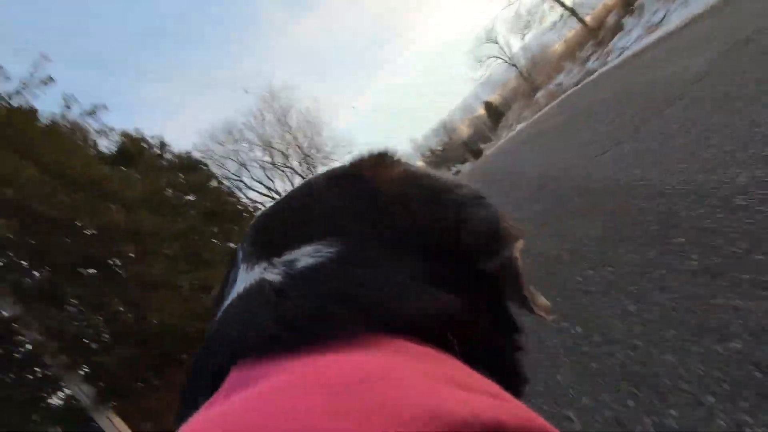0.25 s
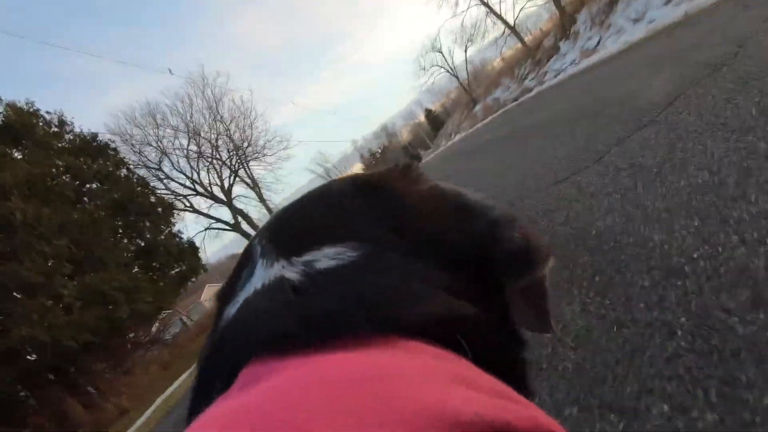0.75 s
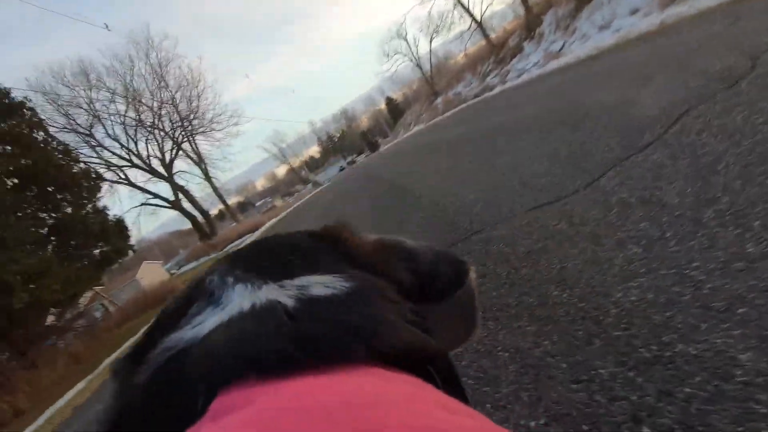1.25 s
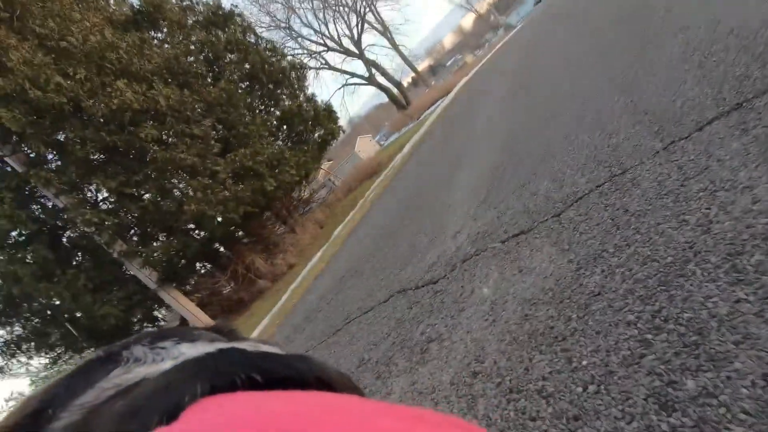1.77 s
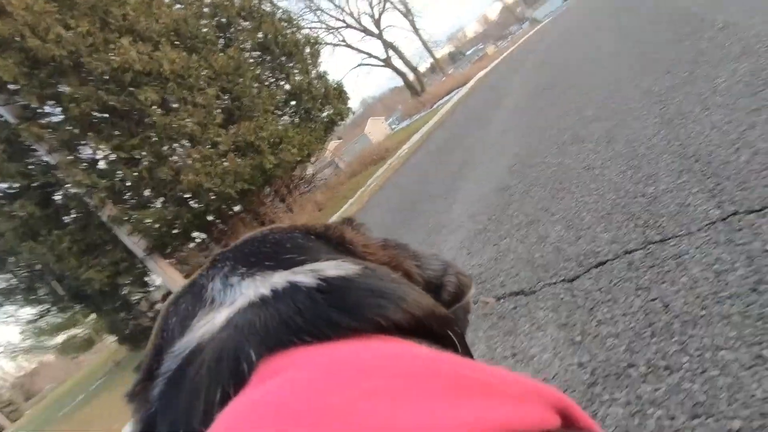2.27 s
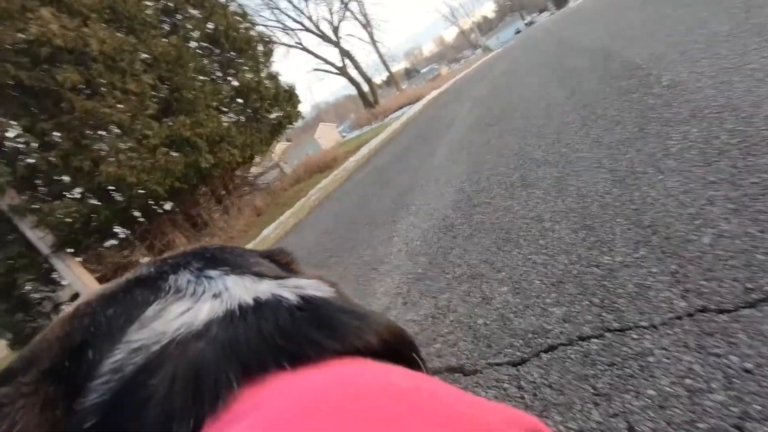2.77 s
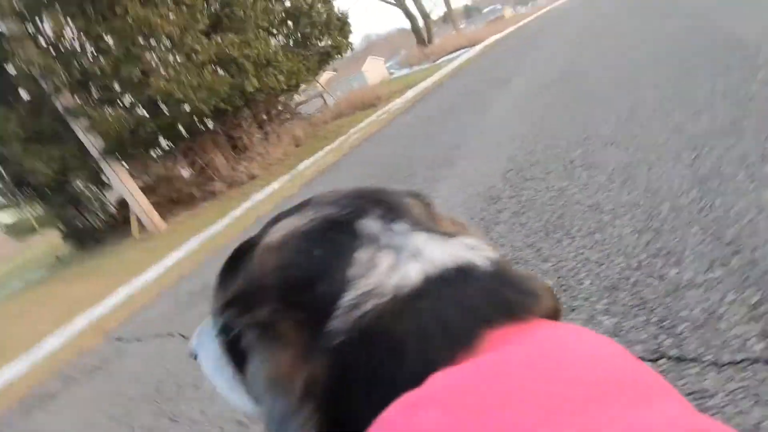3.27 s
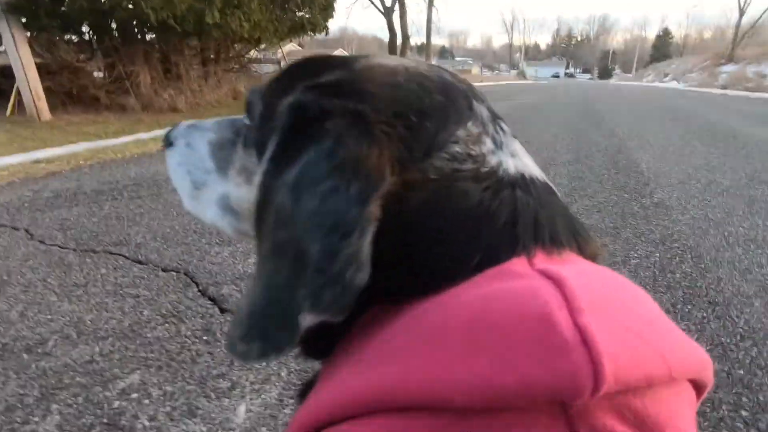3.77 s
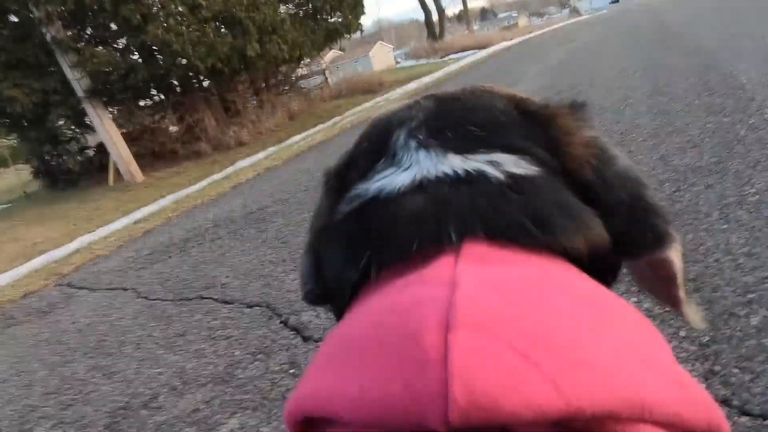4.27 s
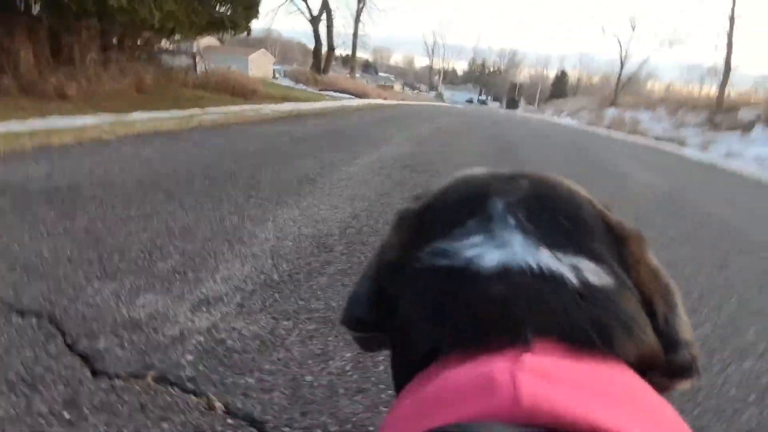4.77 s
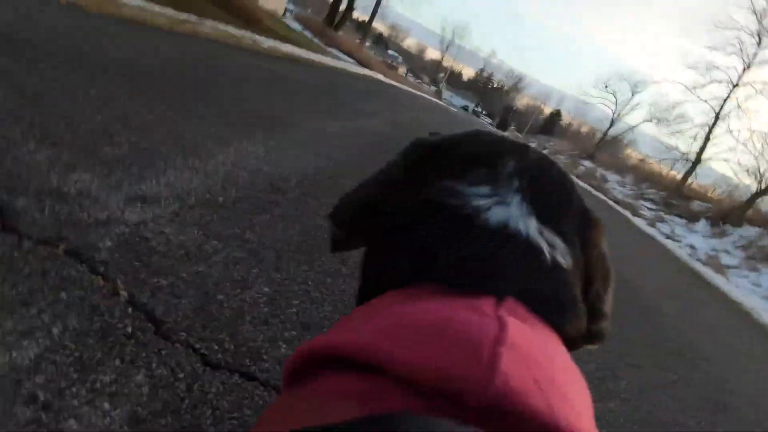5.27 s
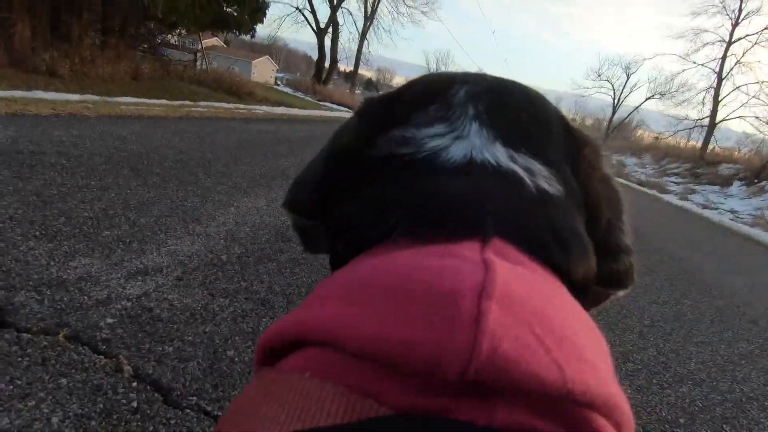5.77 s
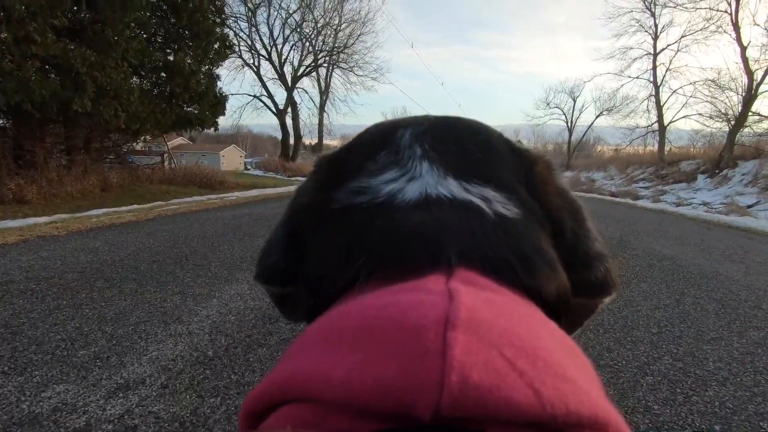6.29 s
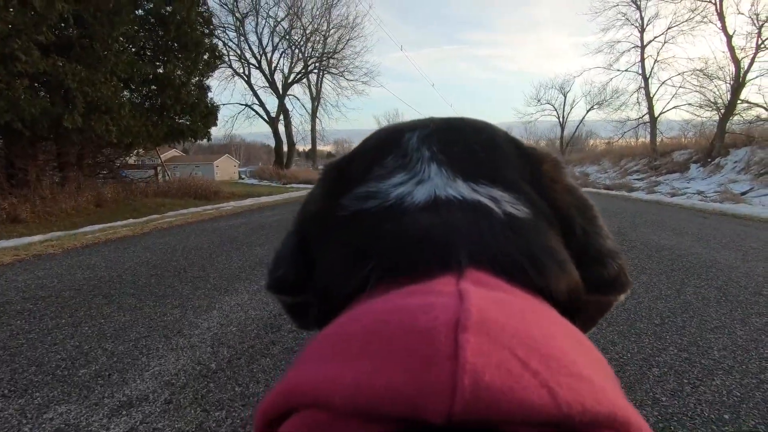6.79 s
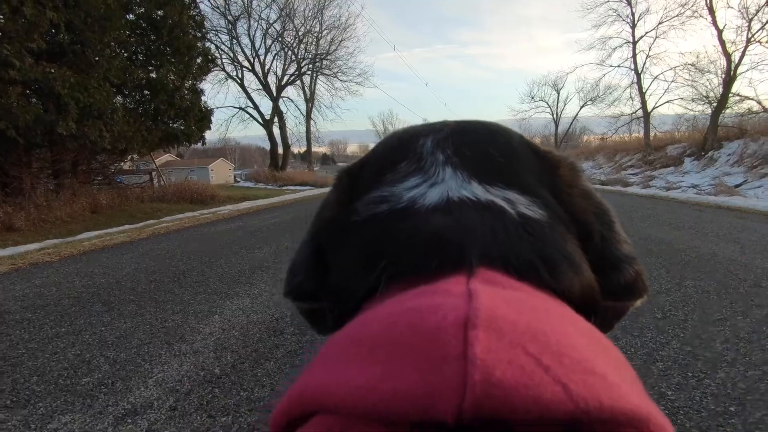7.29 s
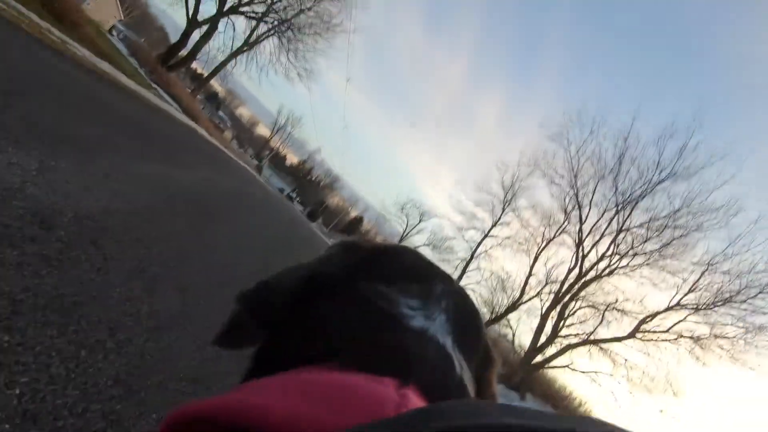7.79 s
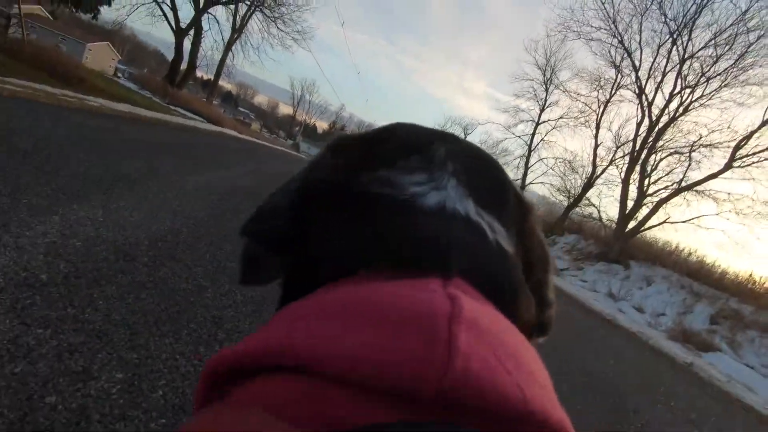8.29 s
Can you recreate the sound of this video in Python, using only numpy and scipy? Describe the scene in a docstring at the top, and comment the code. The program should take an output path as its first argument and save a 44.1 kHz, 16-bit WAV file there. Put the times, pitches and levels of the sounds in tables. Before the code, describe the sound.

Close, uneven strokes of fleece hiss and scrape over a camera strapped to a dog outdoors, with light claw ticks on asphalt, deep wind gusts and a faint traffic hum. Soon the mount starts jolting, adding low thumps and short knocks on the plastic case. These grow strongest past the middle, pause for a moment and come back briefly. Rubbing carries on to a soft final thump.

```python
"""A small camera rides on the fleece coat of a dog on a cold asphalt road.
From the start far traffic hums, wind buffets the microphone, claws tick and cloth rubs the case.
From about 2 s the dog's moves also jolt the strap mount (thumps) and knock the plastic case.
The shaking is strongest just after 5 s, eases briefly past 6 s and returns near 7 s.
Then mostly rubbing is left, with one last soft thump at the end."""
import sys
import numpy as np
from scipy import signal
from scipy.fft import rfft, irfft, next_fast_len
from scipy.io import wavfile
from scipy.ndimage import uniform_filter1d

SR = 44100
rng = np.random.default_rng(int(sys.argv[2]) if len(sys.argv) > 2 else 0)


def wrap_up_sound(samples):
    """Save the sound to the file named by the first command line argument, as 16-bit audio."""
    columns = np.atleast_2d(samples).T
    # keep every value between -1 and 1, then stretch to whole-number steps
    tamed = np.clip(columns, -1, 1)
    steps = np.round(tamed * 32767).astype(np.int16)
    wavfile.write(sys.argv[1], SR, steps)


N = 376613


def from_db(db):
    """Turn decibels (dB) into a number to multiply by."""
    return 10 ** (np.asarray(db) / 20)


def rms_one(x):
    """Scale a signal so that its average strength (rms) is 1."""
    return x / np.sqrt(np.mean(x ** 2) + 1e-20)


def in_time(rows):
    """Join rows of (seconds, values..) with straight lines: one curve for each value column."""
    s, *columns = np.transpose(rows)
    return [np.interp(np.arange(N) / SR, s, c) for c in columns]


def drift(per_s):
    """A wandering curve: per_s random points a second, joined by lines."""
    count = int(N / SR * per_s) + 2
    points = rng.standard_normal(3600)[:count]
    return np.interp(np.arange(N) / SR * per_s, np.arange(count), points)


def coloured(x, points):
    """Turn the lows and highs of x up or down along a curve of (Hz, dB) points."""
    size = next_fast_len(N)
    hz, db = np.transpose(points)
    bin_hz = np.arange(size // 2 + 1) * SR / size
    gain = from_db(np.interp(np.log(bin_hz + 1), np.log(hz), db))
    return irfft(rfft(x, size) * gain, size)[:N]


def resonate(x, modes):
    """Make x ring at each (Hz, width in Hz, dB); filtering twice deepens the gaps between rings."""
    out = 0
    for k, (hz, width_hz, level_db) in enumerate(modes):
        r = np.exp(-np.pi * width_hz * 1.5 / SR)
        band = [(1 - r * r) / 2, 0, (r * r - 1) / 2, 1, -2 * r * np.cos(2 * np.pi * hz / SR), r * r]
        out = out + (-1) ** k * from_db(level_db) * signal.sosfilt([band, band], x)
    return out


def grains(per_s, spread_db, smooth):
    """Tiny random slips of uneven size, mixed with some smooth noise."""
    sizes = from_db(spread_db * np.minimum(rng.exponential(1, N), 5)) * rng.choice([-1, 1], N)
    slipping = rng.random(N) < per_s / SR
    return rms_one(sizes * slipping) + smooth * rng.standard_normal(N)


def add(out, s, burst):
    """Mix a short sound into out, starting at s seconds."""
    i = max(round(s * SR), 0)
    out[i:i + len(burst)] += burst[:N - i]


def stroke_levels(swell_share=0.52, shape=1.48):
    """Hiss, drone and shake levels in dB: each stroke of cloth swells and dies over a light stirring."""
    # Each row: time in seconds, cloth hiss in dB, mount shake in dB.
    stirring = [(0, -71, -49), (1.05, -79, -54.5), (1.5, -78, -64), (1.75, -71, -53), (2.1, -77.5, -53.5),
                (3.0, -74.5, -50), (4.0, -81, -45.5), (5.0, -92, -48.5), (5.55, -83, -70),
                (6.2, -71, -48.5), (6.4, -82, -81), (6.85, -81, -59.5), (7.15, -76, -48.5), (7.6, -96, -65),
                (8.54, -92, -53)]
    # Each row: loudest moment in seconds, length in ms, then hiss, case drone and mount shake in dB.
    strokes = [(0.192, 23, -60.5, -73.5, -56), (0.831, 210, -71.5, -57, -49.5),
               (1.129, 76, -65, -58.5, -46.5), (1.22, 120, -65.5, -51, -46.5),
               (1.369, 128, -65.5, -51.5, -55.5), (1.673, 39, -80, -71, -35.5),
               (2.109, 85, -66.5, -50, -46), (2.219, 42, -60, -53, -60), (2.498, 176, -60, -47.5, -41),
               (2.62, 51, -65, -51.5, -50.5), (2.688, 62, -66, -56, -44), (2.873, 89, -63, -50, -47.5),
               (3.06, 64, -60.5, -47, -39.5), (3.279, 260, -60.5, -48.5, -47.5),
               (3.433, 270, -71.5, -53, -38), (3.776, 90, -62.5, -46, -44.5), (3.855, 116, -65.5, -51, -36),
               (4.062, 58, -64.5, -47.5, -42.5), (4.208, 118, -63.5, -49.5, -49),
               (4.331, 135, -67, -55.5, -38.5), (4.451, 137, -58, -48, -37), (4.673, 130, -67, -51, -41.5),
               (4.851, 320, -68.5, -62, -69), (5.081, 47, -61, -34.5, -26), (5.2, 164, -71.5, -58, -29.5),
               (5.456, 121, -63.5, -49, -30), (5.686, 97, -64, -50.5, -39.5),
               (5.839, 140, -67.5, -56, -40.5), (5.97, 350, -68, -53, -51.5), (6.078, 146, -60, -47.5, -38),
               (6.152, 51, -59.5, -47.5, -52), (6.967, 44, -54, -44.5, -29.5),
               (7.041, 125, -76, -49, -40.5), (7.18, 25, -65, -51.5, -34), (7.237, 37, -58.5, -45.5, -44),
               (7.319, 81, -66.5, -45.5, -39.5), (7.491, 158, -67.5, -53, -43.5),
               (7.778, 204, -64.5, -53, -42), (8.061, 132, -60.5, -48.5, -39.5),
               (8.292, 147, -70.5, -55, -62), (8.521, 243, -67.5, -49, -37)]
    hiss_db, shake_db = in_time(stirring)
    drone_db = shake_db - 15.5
    power = from_db(2 * np.array([hiss_db, drone_db, shake_db]))
    for s, ms, *levels_db in strokes:
        i = np.arange(max(round((s - .4) * SR), 0), min(round((s + .4) * SR), N))
        t = i / SR - s
        side_s = ms / 1000 * np.where(t < 0, swell_share, 1 - swell_share)
        swell = np.exp(-2 * abs(t / side_s) ** shape)  # shape 1 is pointed, 2 is a bell
        power[:, i] += from_db(2 * np.array(levels_db))[:, None] * swell
    return 10 * np.log10(power)


def traffic(level_db=-59):
    """Far traffic is a smooth, dull hum whose level wavers a little."""
    # Each row: frequency in Hz, relative level in dB.
    hum_colour = [(18, -25), (35, 10), (98, -28), (165, 6), (700, -7.5), (1350, -15), (1650, -28.5),
                  (6200, -54.5), (11200, -63)]
    return from_db(level_db + 2.0 * drift(7.8)) * rms_one(coloured(rng.standard_normal(N), hum_colour))


def wind():
    """Wind pushes on the microphone opening in deep gusts that swell when the camera swings."""
    # Each row: time in seconds, base level in dB.
    strength = [(0, -48.5), (1.8, -50.5), (3.8, -43.5), (5.3, -39), (6.2, -60), (6.8, -68), (7.0, -47),
                (8.4, -61)]
    band = signal.butter(2, [18.0, 58.0], "band", fs=SR, output="sos")
    gusts = signal.sosfilt(band, rng.standard_normal(N)) * from_db(7.3 * drift(11.0))
    shake_db = stroke_levels()[2]
    swing_db = shake_db - uniform_filter1d(shake_db, SR // 2)  # against its half-second average
    return from_db(in_time(strength)[0] + 0.39 * swing_db) * rms_one(gusts)


def claws(tail_s=.0015):
    """A claw hits the asphalt: one sharp snap, then a few milliseconds of grit."""
    # Each row: start in seconds, relative level in dB.
    ticks = [(0.186, -57.5), (0.2013, -53), (0.278, -62.5), (0.378, -57), (0.412, -60), (0.53, -56.5),
             (0.637, -53.5), (0.712, -67), (1.1286, -52), (1.314, -51.5), (1.781, -53), (1.9719, -56),
             (2.796, -55), (3.085, -54), (4.1936, -59), (7.6406, -48)]
    snaps, t = np.zeros(N), np.arange(600) / SR
    for (s, level_db), grit in zip(ticks, rng.standard_normal((len(ticks), len(t)))):
        add(snaps, s, from_db(level_db) * (8.2 * (t == 0) + 4.96 * grit * np.exp(-t / tail_s)))
    sparkle = resonate(snaps, [(13000, 1500, -33)])
    return coloured(snaps, [(1500, -16), (5000, 0.5), (8000, -7), (11000, -35)]) + sparkle


def cloth_hiss(hiss_db):
    """Fine fibres slip and hiss; firmer strokes (higher hiss_db) sound crisper and sparkle."""
    # Each row: frequency in Hz, relative level in dB.
    hiss_colour = [(1500, -6.5), (3300, -1), (4200, -1.5), (6200, -5), (8000, -3.5), (10000, -28),
                   (13000, -47.5), (16000, -66.5)]
    # A ring in the hiss that comes and goes. Each row: pitch in Hz, width in Hz, level in dB.
    weave_rings = [(6000, 1300, -4)]
    fibres = rms_one(grains(per_s=1300.0, spread_db=3.7, smooth=2.2))
    hiss = rms_one(coloured(fibres, hiss_colour))
    treble = signal.sosfilt(signal.butter(2, 4800.0, "high", fs=SR, output="sos"), hiss)
    hiss += (from_db(3 * drift(14.0)) - 1) * treble  # brighter and duller by turns
    crisp = signal.sosfilt(signal.butter(4, 8000.0, "high", fs=SR, output="sos"), hiss)
    hiss += from_db(hiss_db + 65) * crisp
    hiss += sum(from_db(4.5 * drift(12.0)) * resonate(hiss, [ring]) for ring in weave_rings)
    sparkle = resonate(fibres, [(13400, 1500, -27)])
    return hiss + from_db(0.9 * (hiss_db + 58)) * sparkle


def case_drone(hiss_over_drone_db, lid_follows=0.74):
    """Coarser slips ring the case and its lid; the lid follows the hiss (1) or the drone (0)."""
    # Each row of both: pitch in Hz, width in Hz, level in dB.
    case_rings = [(372, 137, 11), (675, 61, 5), (789, 58, 3.5), (1126, 220, -6), (1397, 236, -5)]
    lid_rings = [(1840, 280, -3.9), (2065, 240, -2), (2782, 173, -7.5)]
    # Each row: time in seconds, boost of the lid's ring in dB.
    lid_boost = [(.4, -4.5), (1.3, 1.5), (3.0, 3.5), (4.8, 6), (6.5, 0.5), (7.35, 6.5), (8.3, 6)]
    slips = grains(per_s=1500.0, spread_db=3.83, smooth=0.98)
    lid_db = in_time(lid_boost)[0] + lid_follows * hiss_over_drone_db + 4.3 * drift(45.0)
    lid = from_db(lid_db) * resonate(slips, lid_rings)
    case = resonate(slips, case_rings)
    return (case - lid) / case.std()


def cloth():
    """Fleece drags over the case: it hisses, makes the case drone and shakes the mount."""
    # The mount's low rings. Each row: pitch in Hz, width in Hz, relative level in dB.
    mount_rings = [(68, 34.5, 2), (127.1, 32, 6), (160, 89, -4.5), (264.4, 118, -4.5)]
    hiss_db, drone_db, shake_db = stroke_levels()
    pressure_db = 1.5 * drift(40.0)  # the cloth's pressure wavers for all three at once
    hiss = cloth_hiss(hiss_db)
    drone = case_drone(hiss_db - drone_db)
    shake = rms_one(resonate(grains(per_s=150.0, spread_db=2.5, smooth=0.52), mount_rings))
    hiss *= from_db(hiss_db + pressure_db + 1.94 * drift(150.0))
    drone *= from_db(drone_db + pressure_db + 1.45 * drift(90.0))
    shake *= from_db(shake_db + pressure_db + 1.8 * drift(25.0))
    return hiss + drone + shake


def knocks(contact_s=.0017, pitch_spread=.025, hard_db=-34.5):
    """A brief, gritty blow cracks on the plastic case and rings it, a little differently each time."""
    # Each row: start in seconds, then levels in dB for the low rings, the high rings and the crack.
    blows = [(2.086, -35.5, -70, -46), (2.1, -41.5, -70, -49.5), (2.131, -48, -57, -53),
             (2.227, -39.5, -63, -52.5), (2.607, -42, -65, -58), (3.072, -63, -51, -53.5),
             (3.126, -47.5, -70, -55.5), (3.468, -39, -65, -69), (3.476, -37, -44.5, -47.5),
             (3.545, -46.5, -51.5, -58), (3.744, -34, -37.5, -53), (3.75, -33.5, -44.5, -48),
             (4.252, -44, -44.5, -51.5), (4.316, -66, -50, -60), (4.365, -37, -27, -36),
             (4.6, -46, -47.5, -61), (5.035, -45, -56, -75), (5.059, -34.5, -33, -49),
             (5.072, -32.5, -40, -42), (5.08, -48, -34, -41), (5.105, -66, -46, -50),
             (5.119, -37.5, -57, -63), (5.16, -41.5, -48, -78), (5.183, -45, -47, -58),
             (5.197, -39, -49, -47), (5.209, -32.5, -35.5, -44.5), (5.233, -44, -56, -78),
             (5.288, -41.5, -54, -80), (5.418, -37, -62, -45), (5.478, -45, -51, -49.5),
             (5.855, -56, -53, -54.5), (6.021, -35.5, -53, -35.5), (6.066, -53, -44, -50),
             (6.08, -38.5, -46, -45), (6.929, -43, -60, -58), (6.957, -38, -68, -48),
             (7.028, -41.5, -60, -52), (7.077, -54, -72, -68), (7.103, -42.5, -78, -64),
             (7.29, -43, -54, -75), (7.368, -44.5, -55, -74), (8.513, -47, -73, -69)]
    # Three low rings, then three high. Each row: pitch in Hz, seconds to fade by 60 dB.
    rings = [(430, .04), (700, 0.024), (1400, 0.022), (1920, 0.015), (2110, 0.016), (3850, .02)]
    out, cracks, t = np.zeros(N), np.zeros(N), np.arange(2400) / SR
    contact = t / contact_s * np.exp(1 - t / contact_s)
    grits = rng.standard_normal((len(blows), len(rings), len(t)))
    for (s, low_db, high_db, crack_db), grit in zip(blows, grits):
        hollow_db = low_db + 0.49 * (low_db - hard_db)  # harder blows sound more hollow
        levels_db = [low_db, low_db, hollow_db, high_db, high_db, high_db - 16]
        for k, (hz, fade_s) in enumerate(rings):
            r = from_db(-60 / (fade_s * SR))
            cosine = np.cos(2 * np.pi * hz * (1 + pitch_spread * grit[k, 0]) / SR)
            # One filter rings; the wider one keeps the grit near its pitch.
            filters = [[1, 0, 0, 1, -2 * q * cosine, q * q] for q in (r, r ** 12)]
            ring = signal.sosfilt(filters, contact * grit[k])
            add(out, s, from_db(levels_db[k]) * ring / abs(ring).max())
        add(cracks, s, from_db(crack_db) * contact)
    # Each pair: frequency in Hz, relative level in dB.
    crack_colour = [(900, 4.5), (2900, 7.5), (6500, -0.5), (9000, -14.0), (12000, -54.0)]
    cracks *= rms_one(coloured(rng.standard_normal(N), crack_colour))
    dull_plastic = signal.butter(4, 9000, fs=SR, output="sos")
    return signal.sosfilt(dull_plastic, out + cracks)


def thumps(sag=0.16, rise=0.54):
    """A jolt swings the mount briefly; its pitch sags as the strap slackens."""
    # Each row: loudest moment in seconds, level in dB, pitch then in Hz, rough length in ms.
    jolts = [(2.098, -19, 167.4, 21.5), (2.231, -23, 206, 4.3), (2.513, -25, 195, 6.1),
             (3.138, -23, 139, 17), (3.477, -21.5, 165, 18), (3.609, -26.5, 121, 14),
             (3.681, -22, 133, 12.2), (3.752, -26.5, 257, 6.3), (4.217, -26, 290, 2.5),
             (4.378, -23.5, 119, 30), (4.455, -22, 120, 23), (4.613, -27.5, 114, 20),
             (5.092, -20, 176, 4.7), (5.433, -21.5, 114, 13), (5.461, -18.5, 358, 6.4),
             (6.026, -25, 400, 9.3), (6.034, -18.5, 150, 11), (6.083, -28, 402, 18), (6.938, -25, 134, 13),
             (6.971, -28.5, 170, 19), (7.038, -30.5, 218, 22), (7.115, -28, 141, 10), (8.524, -31, 120, 60)]
    out, t = np.zeros(N), np.arange(-.04, .08, 1 / SR)
    for (s, peak_db, hz, ms), offset in zip(jolts, rng.random(len(jolts))):
        width_s = ms / 1000 / 2 * np.where(t < 0, rise, 1)  # rises faster than it falls
        cycles = hz * width_s * (1 - np.exp(-sag * t.clip(-.02) / width_s)) / sag
        swell = from_db(peak_db) * np.exp(-(t / width_s) ** 2)
        add(out, s + t[0], swell * np.sin(2 * np.pi * (cycles + offset)))
    return out


def scene():
    """All the sounds reach one microphone."""
    return (cloth() + thumps() + knocks() + claws() + wind() + traffic())[None]


def record(dry, cutoff_hz=15500):
    """Add a faint electronic hiss, cut the highest treble and fade out the last few milliseconds."""
    dry = dry + from_db(-99) * rng.standard_normal(dry.shape)
    fade = np.clip(np.arange(N)[::-1] / 200, 0, 1)
    return fade * signal.sosfilt(signal.cheby2(8, 30, cutoff_hz, fs=SR, output="sos"), dry)


dry = scene()
out = record(dry)
wrap_up_sound(out)
```